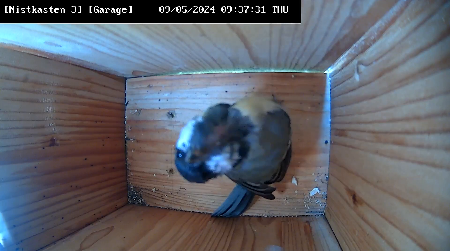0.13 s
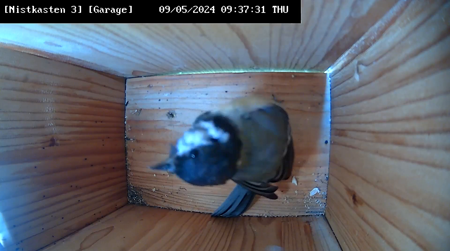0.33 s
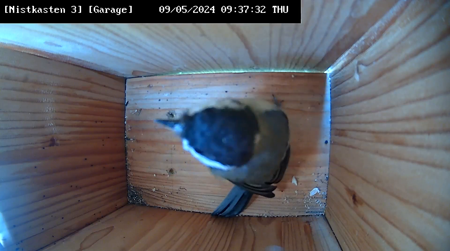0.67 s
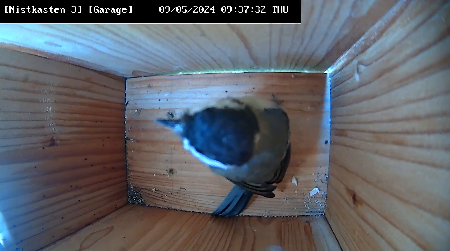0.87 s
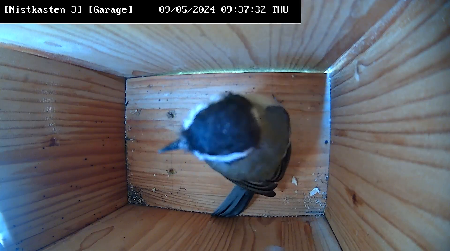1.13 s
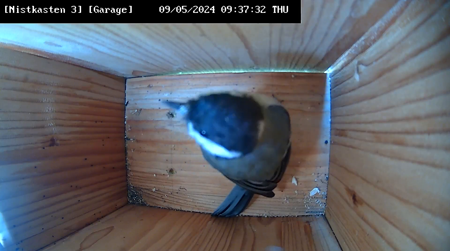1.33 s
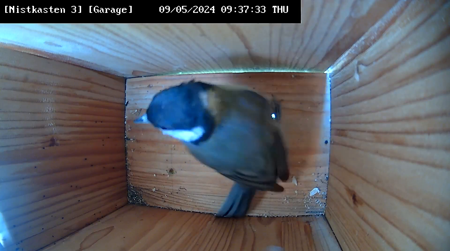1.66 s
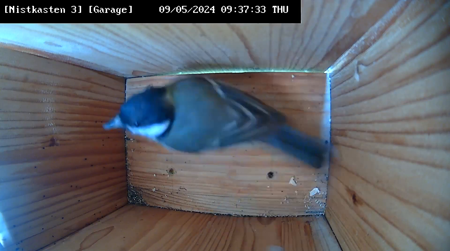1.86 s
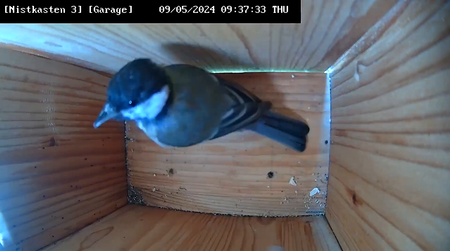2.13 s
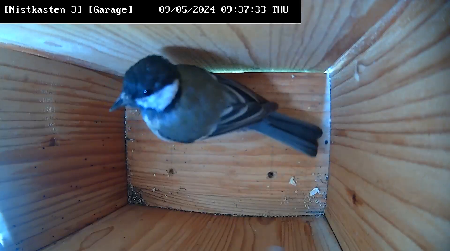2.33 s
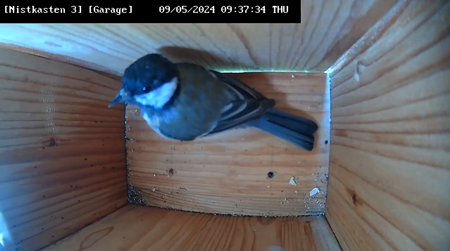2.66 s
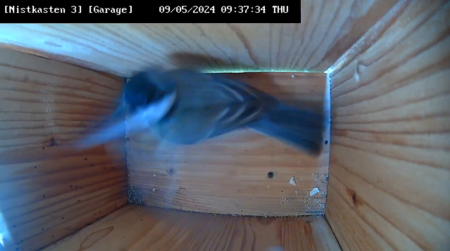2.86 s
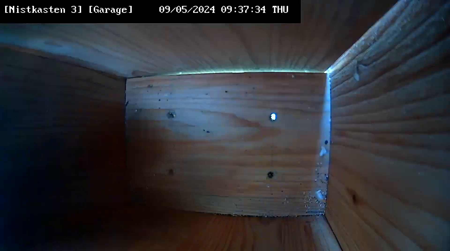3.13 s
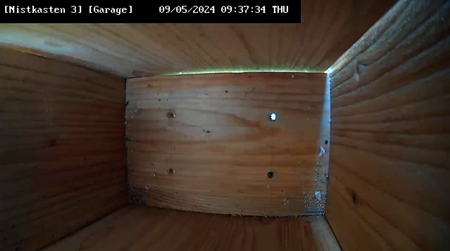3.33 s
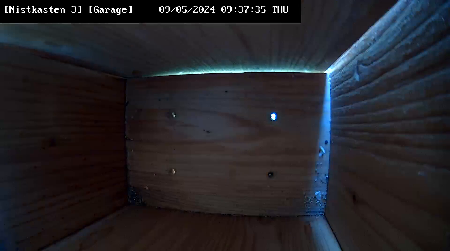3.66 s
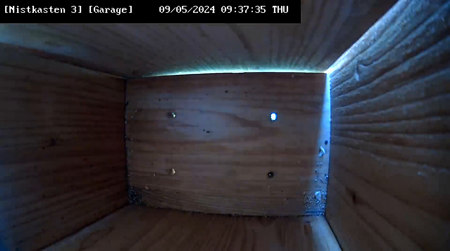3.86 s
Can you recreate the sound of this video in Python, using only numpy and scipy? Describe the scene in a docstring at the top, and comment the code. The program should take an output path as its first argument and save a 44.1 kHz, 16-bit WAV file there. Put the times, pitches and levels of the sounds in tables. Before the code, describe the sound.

Harsh, raspy bird churring close up in a wooden box, ending with wing thumps and claw scrabbling.

```python
"""Churring bird in a nest box

A small bird churrs seven times inside a wooden nest box, then jumps to the hole with one more churr,
wing pushes and scrabbling claws. Its two gliding voices mix with rasping noise, scrapes ring the boards
and pressure bumps ring the air inside. Filtered noise rumbles as wind on the microphone, gliding sines
whistle far off as another bird, and short pulses tick on the line as electrical interference."""
import sys
import numpy as np
from scipy import signal
from scipy.fft import rfft, irfft
from scipy.io import wavfile

SR = 44100
rng = np.random.default_rng(int(sys.argv[2]) if len(sys.argv) > 2 else 0)


def generate_wav(signal):
    """Clip the signal to [-1, 1] and save it as 16-bit WAV at the path in sys.argv[1]."""
    frames = np.transpose(np.atleast_2d(signal))
    scaled = np.clip(frames, -1, 1) * 32767
    pcm = np.round(scaled).astype(np.int16)
    wavfile.write(sys.argv[1], SR, pcm)


def voltage_ratio(decibels):
    """Convert decibels (scalar or array-like) to amplitude ratios, 20 dB per decade."""
    exponent = np.asarray(decibels, float) / 20
    return 10 ** exponent


N = 176400


def in_time(rows):
    """A breakpoint curve read at every sample."""
    return np.interp(np.arange(N) / SR, *np.transpose(rows))


def cut(x, hz, kind="low", order=2):
    """Butterworth filter."""
    return signal.sosfilt(signal.butter(order, hz, kind, fs=SR, output="sos"), x)


def noise(hz, order=2):
    """Low-passed noise of rms 1, its first second dropped so the filter has settled."""
    x = cut(rng.standard_normal(N + SR), hz, order=order)[SR:]
    return x / x.std()


def coloured(spectrum):
    """Noise shaped by a spectrum drawn over log frequency, rms 1."""
    hz, db = np.transpose(spectrum)
    f = np.arange(N // 2 + 1) * SR / N + 1
    gain = voltage_ratio(np.interp(np.log(f), np.log(hz), db))
    x = irfft(rfft(rng.standard_normal(N)) * gain, N)
    return x / x.std()


def ring(x, hz, t60):
    """Two-pole resonance: a unit click sets a sine of about height 1 ringing, down 60 dB after t60 seconds."""
    r, w = voltage_ratio(-60 / (t60 * SR)), 2 * np.pi * hz / SR
    return signal.lfilter([0, np.sin(w)], [1, -2 * r * np.cos(w), r * r], x + 1e-18)


def voice(times, dbs, pitches, late, slur):
    """One side of the syrinx: each note swells, bends downward and breaks off; gives envelope and phase."""
    rise_s, fall_s = .0044, .003  # Gaussian widths
    late_stretch = 1.7  # late notes swell longer, without a bend in the swell
    early_slur = .35  # share of the bend in the swell of other notes
    bend_per_s = -110000 / 7000  # pitch bend as a fraction of the note's pitch
    wobble_hz, flutter_db = 110, 2.2  # unsteady pitch and level, rms
    t = np.arange(N) / SR
    nearest = np.searchsorted((times[1:] + times[:-1]) / 2, t)
    d = np.clip(t - times[nearest], -.05, .05)  # time from the note's peak
    rise = rise_s * np.where(late, late_stretch, 1)[nearest]
    width = np.where(d < 0, rise, fall_s)
    env = voltage_ratio(dbs[nearest]) * np.exp(-.5 * (d / width) ** 2)
    bend = np.where(d < 0, early_slur * ~late[nearest], 1) * np.clip(d, -.01, .01)
    hz = pitches[nearest] * (1 + slur * bend_per_s * bend) + wobble_hz * noise(276)
    flutter = voltage_ratio(flutter_db * noise(470))
    phase = 2 * np.pi * np.cumsum(cut(hz, 1010)) / SR
    return cut(env, 810) * flutter, phase


def churr():
    """Both sides of the syrinx, an overtone, their difference tone, and throat air lingering between notes."""
    # trill notes: (peak time [s], level before the voice balance [dB], upper voice pitch [Hz])
    notes = [(1.146, -34, 4870), (1.17, -29, 5235), (1.186, -31, 5500), (1.1963, -36.5, 6500),
             (1.2123, -37, 6680), (1.2271, -32.5, 6490), (1.2444, -31, 6690), (1.2574, -32.5, 6690),
             (1.273, -27.5, 7070), (1.2866, -29, 7640), (1.379, -25.5, 4934), (1.394, -37.5, 6580),
             (1.411, -25, 5830), (1.4263, -37.5, 6130), (1.4387, -33.5, 6470), (1.4532, -33, 6630),
             (1.467, -33, 6700), (1.4862, -30, 6680), (1.4992, -36, 7130), (1.6098, -31, 6620),
             (1.6254, -31, 6960), (1.6421, -28, 6860), (1.6567, -26, 7110), (1.6724, -27.5, 7320),
             (1.6856, -23, 7110), (1.7555, -33.5, 6320), (1.7704, -31.5, 7050), (1.7873, -27.5, 6880),
             (1.8022, -31.5, 6560), (1.815, -23, 7210), (1.833, -21.5, 7130), (1.8945, -29.5, 6960),
             (1.912, -23.5, 6990), (1.9296, -21.5, 6960), (1.9425, -26.5, 7120), (1.958, -18.5, 7360),
             (1.9671, -25.5, 6980), (2.034, -28, 6640), (2.0495, -31.5, 6410), (2.064, -25, 6690),
             (2.0798, -29.5, 6940), (2.0934, -22, 6910), (2.1108, -22, 6880), (2.1732, -30.5, 6725),
             (2.191, -28, 6510), (2.202, -28.5, 6700), (2.2186, -27, 6526), (2.2347, -25, 6820),
             (2.2485, -28.5, 6750), (2.2656, -27, 7245), (3.0226, -37.5, 6870), (3.0426, -34, 6800),
             (3.0599, -30.5, 7320), (3.087, -30, 7510), (3.112, -30.5, 7540)]
    # moments when the lower voice steps up: (time [s])
    step_up_s = [1.24, 1.45, 1.65, 1.81, 1.95, 2.09, 3.05]
    # relative spectrum of the throat's air noise: (frequency [Hz], level per Hz [dB])
    throat = [(800, -50.5), (2800, -6), (4200, -1), (5400, -8.5), (6800, 2), (9000, -3.5)]
    lower_hz, raised_hz, raised_for_s = 3674, 4277, .07
    level_above_hz = 7170  # raised notes whose upper voice is higher than this have a level swell
    weak_below_hz, weak_db = 5800, -15  # the upper voice is faint on its lowest notes
    lower_lag_s, upper_slur, lower_slur = .004, .98, .3
    lower_db, octave_db, difference_db = -11.5, -3.5, -21
    rasp_db, rasp_hold_s, rasp_in_wall_db = -12.5, .036, -23.5
    rasp_even = .45  # exponent that evens out the air from note to note

    s, db, upper_hz = np.transpose(notes)
    since = s[:, None] - step_up_s
    raised = ((since > 0) & (since < raised_for_s)).any(axis=1)
    late = raised & (upper_hz > level_above_hz)
    upper_db = db + weak_db * (upper_hz < weak_below_hz)
    lower_pitch = np.where(raised, raised_hz, lower_hz)
    upper, upper_phase = voice(s, upper_db, upper_hz, late, upper_slur)
    lower, lower_phase = voice(s + lower_lag_s, db, lower_pitch, late, lower_slur)
    octave = cut(lower * np.sin(2 * lower_phase), 8400, "high", order=6)
    difference = np.sqrt(np.abs(upper * lower)) * np.sin(upper_phase - lower_phase)
    tones = upper * np.sin(upper_phase) + voltage_ratio(lower_db) * lower * np.sin(lower_phase)
    tones = tones + voltage_ratio(octave_db) * octave + voltage_ratio(difference_db) * difference

    r = np.exp(-1 / (rasp_hold_s * SR))
    even = np.abs(lower) ** rasp_even / 4
    lingering = signal.lfilter([1 - r], [1, -r], even)
    air = voltage_ratio(rasp_db) * (0.56 * even + lingering)
    return tones + air * coloured(throat) + voltage_ratio(rasp_in_wall_db) * walls(air)


def walls(x):
    """Board modes rung by noise under x; as the bird moves, their strengths shift, drawn at random."""
    # wall modes: (frequency [Hz], relative level [dB])
    modes = [(1140, -30), (1400, -10.5), (1930, -16.5), (2780, -16.5), (3700, -4), (4540, -12), (5930, -12)]
    t60_s, shift_db = .014, 2.5
    out = np.zeros(N)
    for hz, db in modes:
        strength = voltage_ratio(db + shift_db * noise(12.3))
        out += strength * ring(x * rng.standard_normal(N), hz, t60_s)
    return out


def scrabble():
    """Claws and feathers on wood: bursts of uneven scrapes start sharply, fade, ring the walls and rustle."""
    # bursts: (start [s], length [s], relative level [dB])
    bursts = [(1.579, 0.016, -36), (2.978, 0.079, -40), (3.134, 0.0056, -17), (3.147, 0.016, -21.5),
              (3.158, 0.083, -36.5), (3.239, 0.046, -34), (3.33, 0.049, -40), (3.393, 0.28, -47.5),
              (3.527, 0.025, -43.5), (3.655, 0.0094, -31.5)]
    scrapes_per_s, scrape_size_db = 4000, 3.5  # mean density, and scale of the exponential spread upward
    wall_db, rustle_db = -9.5, 0
    t = np.arange(N) / SR
    sizes = voltage_ratio(scrape_size_db * np.minimum(rng.exponential(1, N), 4))
    hits = (rng.random(N) < scrapes_per_s / SR) * sizes
    envelope = np.zeros(N)
    for s, length, db in bursts:
        along = (t - s) / length
        envelope += voltage_ratio(db) * np.clip(along * 14, 0, 1) * np.exp(-np.abs(along) ** 3)
    drive = hits * envelope
    rustle = cut(drive * rng.standard_normal(N), 3200, "high")
    return voltage_ratio(wall_db) * walls(drive) + voltage_ratio(rustle_db) * rustle


def pushes():
    """Wings and landing push air at the microphone in smooth bumps, which also ring the air in the box."""
    # bumps: (peak time [s], signed pressure [relative], Gaussian width [s])
    bump_table = [(3.017, 1, 0.0049), (3.058, 0.33, 0.0034), (3.165, 0.78, 0.014), (3.193, -0.82, .003),
                  (3.287, 0.27, 0.0082), (3.437, -0.76, 0.0045)]
    cavity_hz, cavity_t60_s, cavity_db = 235.6, .24, -34
    t = np.arange(N) / SR
    bumps, kicks = np.zeros(N), np.zeros(N)
    for s, pressure, width in bump_table:
        bumps += pressure * np.exp(-.5 * ((t - s) / width) ** 2)
        kicks[int(s * SR)] = pressure
    return bumps + voltage_ratio(cavity_db) * ring(cut(kicks, 210), cavity_hz, cavity_t60_s)


def far_bird():
    """Thin far whistles: faint sines, level or gliding, with tapered ends."""
    # whistles: (start [s], length [s], peak level [dB], first pitch [Hz], last pitch [Hz])
    whistles = [(2.826, .026, -60, 3800, 4150), (2.855, .065, -65, 3780, 3760),
                (3.935, .07, -62, 3790, 3790)]
    out = np.zeros(N + SR)
    for s, length, db, first_hz, last_hz in whistles:
        n, at = int(length * SR), int(s * SR)
        phase = 2 * np.pi * np.cumsum(np.linspace(first_hz, last_hz, n)) / SR
        out[at:at + n] += voltage_ratio(db) * signal.windows.tukey(n, .4) * np.sin(phase)
    return out[:N]


def wind():
    """Wind on the microphone: lumpy low noise follows the gusts, over a deeper sway that follows them less."""
    # gusts, before the lumps: (time [s], level [dB])
    gusts = [(.17, -55.5), (.22, -40.5), (.8, -47.5), (.86, -61), (2.15, -57.5), (2.25, -44), (2.95, -45),
             (3.1, -37.5), (3.6, -52.5)]
    rumble_hz, lump_db, lump_hz = 117, 3.96, 9.1
    deep_hz, deep_db, deep_follows = 33.2, -38.5, .37  # last: share of the gust's dB swing
    gust = in_time(gusts)
    rumble = voltage_ratio(gust + lump_db * noise(lump_hz)) * noise(rumble_hz)
    deep_level = voltage_ratio(deep_db + deep_follows * (gust - gust.mean()))
    return rumble + deep_level * noise(deep_hz, order=3)


def ticks():
    """Electrical interference: flat-topped upward pulses, wide ones at set times and thin ones between."""
    # wide pulses: (time [s])
    wide = np.array([0.044, 0.112, 0.119, 0.132, 0.2389, 0.3369, 0.3425, 0.4352, 0.5278, 0.5418, 0.5488,
                     0.6221, 0.735, 0.7388, 0.7454, 0.8835, 0.9162, 0.919, 0.9244, 1.126, 1.3179, 1.3222,
                     1.3265, 1.544, 1.549, 1.7205, 1.7337, 1.941, 1.9459, 1.949, 2.13, 2.1356, 2.1427,
                     2.3308, 2.3406, 2.3422, 2.3435, 2.486, 2.5294, 2.5368, 2.5443, 2.5553, 2.577, 2.588,
                     2.5967, 2.7346, 2.9324, 3.3324, 3.3444, 3.3531, 3.5396, 3.5427, 3.5534, 3.7315, 3.8235,
                     3.9297, 3.9417, 3.946, 3.9487])
    tick_db = -33  # height of a wide pulse
    wide_ms, thin_ms, width_spread = .26, .06, .45  # median widths, and their log spread
    clock_start_s, clock_s, clock_jitter_s = .017, .029, .0051
    companion_s = .013  # spread of the thin pulse beside each wide one
    spread_db, lull_db = 2.5, 4.0  # thin pulses: pulse to pulse, and slow swings

    # thin pulses: a loose clock, then the companions
    clock = clock_start_s + clock_s * np.arange(170)
    draw = rng.standard_normal((len(clock) + len(wide), 3))
    jitter = np.r_[np.full(len(clock), clock_jitter_s), np.full(len(wide), companion_s)]
    thin = np.r_[clock, wide] + draw[:, 0] * jitter
    wide_widths = wide_ms * np.exp(width_spread * rng.standard_normal(len(wide)))
    thin_widths = thin_ms * np.exp(width_spread * draw[:, 1])
    thin_at = np.minimum(np.abs(thin) * SR, N - 1).astype(int)
    lull = lull_db * (noise(3.0)[thin_at] - 1)  # swings about a level lull_db below the wide pulses
    heights = voltage_ratio(np.r_[np.zeros(len(wide)), lull + spread_db * draw[:, 2]])

    s, ms = np.r_[wide, thin], np.r_[wide_widths, thin_widths]
    out, near = np.zeros(N + SR), np.arange(-16, 17)
    centres = (np.abs(s) * SR).astype(int) + 16  # 16 samples of margin ahead
    for at, half, height in zip(centres, ms * SR / 2000, heights):
        # edge samples are partly filled; a pulse thinner than a sample is lowered
        out[at + near] += height * np.clip(half - np.abs(near) + .5, 0, min(1, 2 * half))
    return voltage_ratio(tick_db) * out[16:N + 16]


def scene():
    """Everything acoustic reaches one microphone."""
    return (churr() + scrabble() + pushes() + far_bird() + wind())[None]


def top_cut(x):
    """Nothing passes above the cut-off."""
    return signal.sosfilt(signal.butter(12, 9230, fs=SR, output="sos"), x)


def record(dry):
    """Cuts the bass, adds line interference and circuit hiss, then cuts the treble."""
    bass_cut_hz, treble_cut_hz = 15, 7460
    hiss_db, hiss_hz = -65.5, 3500
    x = cut(dry, bass_cut_hz, "high") + ticks() + voltage_ratio(hiss_db) * noise(hiss_hz, order=1)
    return top_cut(cut(x, treble_cut_hz, order=12))


dry = scene()
out = record(dry)
generate_wav(out)
```